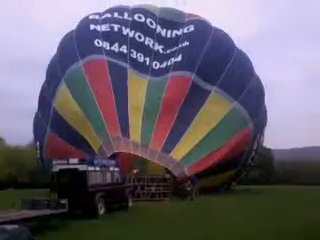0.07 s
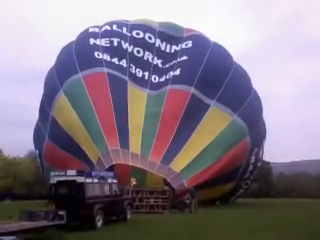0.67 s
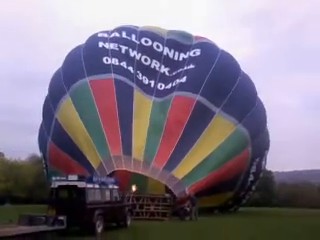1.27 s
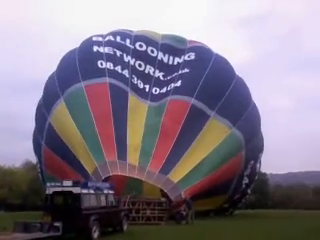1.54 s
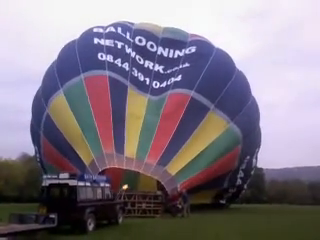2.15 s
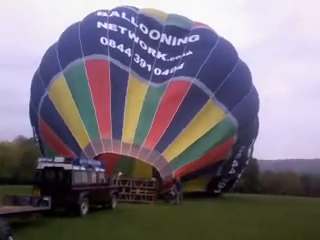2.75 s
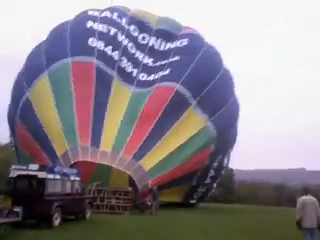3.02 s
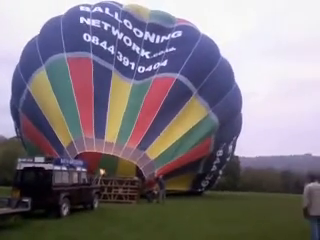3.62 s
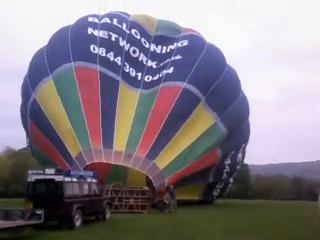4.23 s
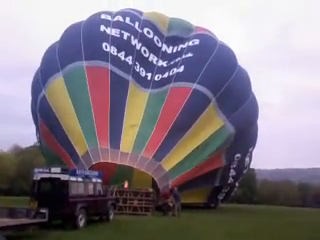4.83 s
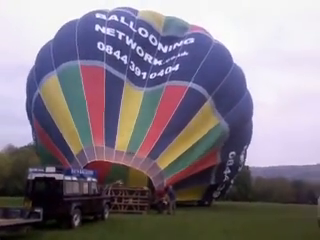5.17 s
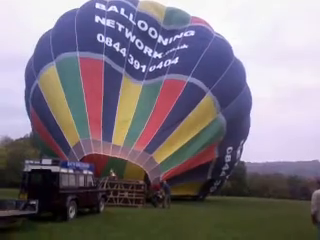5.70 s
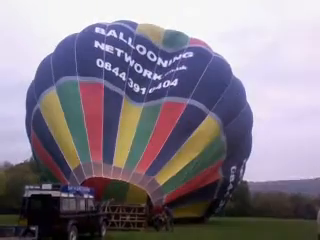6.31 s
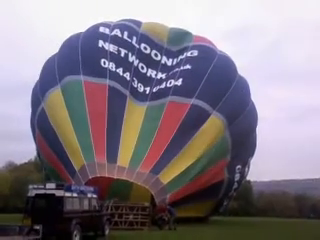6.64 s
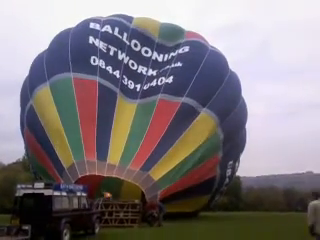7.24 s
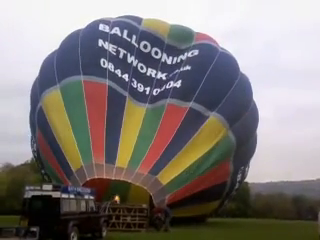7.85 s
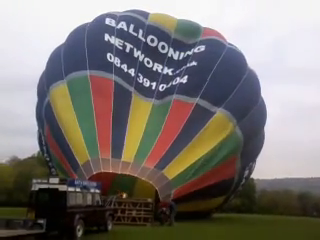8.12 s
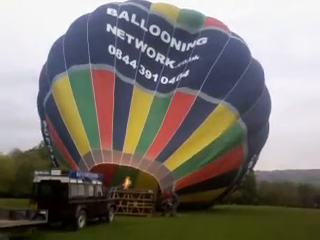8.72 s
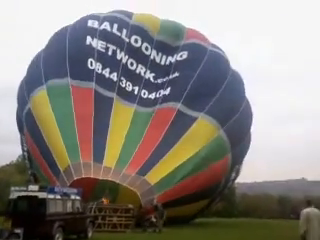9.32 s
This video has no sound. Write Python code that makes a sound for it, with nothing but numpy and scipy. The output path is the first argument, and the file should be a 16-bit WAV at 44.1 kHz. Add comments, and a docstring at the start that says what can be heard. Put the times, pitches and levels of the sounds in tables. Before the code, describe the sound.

A petrol fan filling a hot air balloon starts abruptly as a loud, steady, buzzing drone with rushing, hissing air, and a gas burner roars behind it. After about six seconds the engine is switched off, falling in pitch and puffing ever slower as it spins down. The burner carries on, softer, with a few dull flame flaps. The sound is outdoors, on a small, treble-heavy microphone that the fan overloads.

```python
"""A loud, buzzing drone with rushing air starts abruptly, and a flame roars behind it.
A petrol fan is filling a hot air balloon in an open field: its one-cylinder engine turns a two-blade
propeller. Near the end the engine is switched off and puffs as it spins down; the burner roars on.
The fan overloads the narrow, treble-heavy microphone of a small camera."""
import sys
import numpy as np
from scipy import signal
from scipy.fft import rfft, irfft, next_fast_len
from scipy.io import wavfile

SR = 44100
rng = np.random.default_rng(int(sys.argv[2]) if len(sys.argv) > 2 else 0)


def wav_record(signal):
    """Record a signal, one row per channel, as 16-bit PCM in the file named by sys.argv[1]."""
    frames = np.transpose(np.atleast_2d(signal))
    bounded = np.clip(frames, -1, 1)
    # unit amplitude maps onto the largest positive 16-bit level
    quanta = np.round(bounded * 32767).astype(np.int16)
    wavfile.write(sys.argv[1], SR, quanta)


N = 422037
TIME = np.arange(N) / SR
START_S, IGNITION_OFF_S = 0.9045, 6.79
FULL_SPEED = 59.3  # shaft turns per second

# hiss of the engine and the air stream: f/Hz, relative level/dB
HISS = [(2500, -59), (3400, -18), (4100, -11.5), (4700, -8.5), (5300, -4), (5900, -2.5), (6500, -1.5),
        (7000, -2.5), (7500, -4)]


def from_db(db):
    """Turn decibels into a gain to multiply by."""
    return 10 ** (np.asarray(db) / 20)


def rms_one(x):
    """Scale a sound to an average power of 1."""
    return x / np.sqrt(np.mean(x ** 2) + 1e-20)


def in_time(rows):
    """Turn each column after the time column into a curve, one value per sample."""
    times, *columns = np.transpose(rows)
    return [np.interp(TIME, times, column) for column in columns]


def at_hz(spectrum, hz):
    """Read a spectrum's level between its points, on a log-frequency axis."""
    points_hz, db = np.transpose(spectrum)
    return np.interp(np.log(np.maximum(hz, 1)), np.log(points_hz), db)


def coloured(x, spectrum):
    """Make each frequency of a sound louder or softer, as a spectrum says."""
    size = next_fast_len(N, True)
    gain = from_db(at_hz(spectrum, np.fft.rfftfreq(size, 1 / SR)))
    return irfft(rfft(x, size) * gain, size)[:N]


def noise(spectrum):
    """Noise shaped by a spectrum, with a power of 1."""
    return rms_one(coloured(rng.standard_normal(N), spectrum))


def drift(rate_hz):
    """A smooth random wobble of typical size 1."""
    step = 40  # samples per random value
    pole = np.exp(-2 * np.pi * rate_hz * step / SR)
    slow = signal.lfilter([1], [1, -2 * pole, pole * pole], rng.standard_normal(N // step + 2002))[2000:]
    return np.interp(np.arange(N) / step, np.arange(len(slow)), rms_one(slow))


def swell(start, length, edge_s=0.2):
    """Rise to 1, hold and fall back."""
    inside = np.minimum(TIME - start, start + length - TIME)
    return np.clip(inside / edge_s + 0.5, 0, 1)


def resonances(modes):
    """Swirling air makes something ring: one narrow band of noise for each pitch."""
    out = 0
    for hz, width_hz, db in modes:
        radius = np.exp(-np.pi * width_hz / SR)
        poles = [1, -2 * radius * np.cos(2 * np.pi * hz / SR), radius * radius]
        out += from_db(db) * rms_one(signal.lfilter([1, 0, -1], poles, rng.standard_normal(N)))
    return out


def bursts(events, spectrum, rise_s, gain_db):
    """Bursts of noise that rise and die away."""
    envelope = np.zeros(N)
    for start, db in events:
        age = np.maximum(TIME - start, 0) / rise_s
        envelope += from_db(db + gain_db) * age * np.exp(1 - np.minimum(age, 20))
    return envelope * noise(spectrum)


def firing(fade_s=0.067):
    """1 while the engine burns fuel, falling quickly to 0 once it is switched off."""
    return np.clip((IGNITION_OFF_S - TIME) / fade_s + 1, 0, 1)


def shaft_speed(coast_s=1.23):
    """The engine's governor holds the speed steady; after the switch-off, drag lets it die away."""
    # the shaft under power: t/s, speed/(turns per s)
    running = [(0.9, 59.38), (2.3, 59.51), (3.1, 59.3), (3.5, 59.34), (4.6, 59.1), (5.3, 59.26),
               (5.9, 59.12), (6.79, 59.1)]
    governed, = in_time(running)
    return governed * np.exp(-np.maximum(TIME - IGNITION_OFF_S, 0) / coast_s)


def harmonic(multiple, level_db, angle, slowing, echo, wander_hz=0.96):
    """One blade tone plus its wandering echo; slower blades lose their high tones first."""
    phase = multiple * angle + rng.standard_normal()
    tone = (1 + echo * drift(wander_hz)) * np.sin(phase) + echo * drift(wander_hz) * np.cos(phase)
    tone *= np.sqrt(2 / (1 + 2 * echo ** 2))  # back to a power of about 1
    fade_db = slowing * (46.5 + 20 * max(multiple - 6, 0))
    return from_db(level_db + fade_db + 0.68 * drift(17)) * tone


def blade_tones(turns, slowing):
    """Each passing blade sends out a push of air: a drone, and a buzz whose tones swell and fade."""
    # the drone's two loud tones: t/s, relative level/dB at 3 times and at 5 times the blade rate
    drone = [(1.0, -26, -22.5), (1.59, -24.5, -22.5), (2.54, -25.5, -24.5), (2.9, -30, -24.5),
             (3.89, -29, -23), (4.19, -31, -23.5), (5.03, -26.5, -24.5), (6.0, -30.5, -27.5),
             (6.16, -26, -31.5), (6.7, -29.5, -26)]
    # the weaker tones of the buzz: multiple of the blade rate, relative level/dB
    buzz = [(2, -15), (4, -14), (6, -16), (7, -11), (8, -15), (9, -14), (10, -12.5), (11, -11), (12, -7.5),
            (13, -12.5), (14, -10), (15, -11.5), (16, -15.5), (17, -17), (18, -21), (19, -14.5), (20, -15)]
    # one of them stands out for a while: start t/s, length/s, multiple, lift/dB
    swells = [(0.8, 2.9, 10, 6.5), (1.4, 2.3, 2, 5.5), (1.6, 3.78, 9, 5), (1.95, 0.77, 6, 6),
              (3.7, 0.53, 9, 4), (3.7, 0.79, 13, 8), (3.75, .45, 4, 7), (4.25, 1.85, 2, 7),
              (4.453, 2.7, 6, 9), (4.946, 0.4, 10, 10.5), (5.685, 0.33, 7, 7), (5.953, 1.01, 4, 10)]
    angle = 2 * np.pi * 2 * turns + 0.022 * drift(12.4)  # two blades a turn, with a slight flutter
    out = 0
    for multiple, db in zip((3, 5), in_time(drone)):
        out += harmonic(multiple, db + 2, angle, slowing, echo=0)
    for multiple, db in buzz:
        lift_db = sum(lift * swell(start, length) for start, length, k, lift in swells if k == multiple)
        echo = from_db(-20.5) * np.sqrt(multiple)  # shorter waves feel the changing echo path more
        out += harmonic(multiple, db - 20.5 + lift_db, angle, slowing, echo)
    out *= from_db(firing() - 1)  # 1 dB softer with the engine off
    # a small propeller gives off little bass
    return signal.sosfilt(signal.butter(8, 221, "high", fs=SR, output="sos"), out)


def air_stream(turns, slowing):
    """Air swirls off the blades with a rush; the hiss surges each time the exhaust valve opens."""
    # air moved by the fan: t/s, relative rush level/dB, relative hiss level/dB
    air = [(0.95, -16, -9), (1.32, -15.5, -11), (2.5, -17.5, -11.5), (2.68, -17, -9.5), (4.04, -15.5, -9),
           (4.73, -17.5, -10), (5.2, -15, -11), (6.6, -20, -10), (6.75, -17, -9.5)]
    # swirling air off the blades: f/Hz, relative level/dB
    rush_spectrum = [(40, -17), (110, -11.5), (180, -9.5), (290, -19), (380, -12), (500, -9.5), (740, -8),
                     (900, -11.5), (1350, 3), (1850, 3.5), (2150, 0.5), (3150, -2), (4200, -1), (7000, -22)]
    rush_db, hiss_db = in_time(air)
    rush = from_db(rush_db - 2.5 + 63 * slowing) * noise(rush_spectrum)
    valve_open = np.exp(2.5 * (np.cos(np.pi * turns) - 1))  # peaks every second turn
    depth_db = 1.3 + 2.7 * firing()
    surge = rms_one(from_db(depth_db * (valve_open + 0.06)))
    hiss = from_db(hiss_db + 8.5 + 0.43 * drift(12) + 88 * slowing) * noise(HISS)
    return rush + hiss * surge


def frame():
    """The fan's frame and guard shake and ring at a few pitches."""
    # their resonances: f/Hz, width/Hz, level/dB
    modes = [(1425, 115, -31.5), (1740, 220, -32), (2380, 70, -30.5), (2850, 84, -31.5), (3598, 100, -29.5)]
    return resonances(modes) * from_db(drift(0.79))


def exhaust(turns, gain_db, uneven_db, size=4096):
    """One bang every second turn, smeared out by the silencer; no two are equally strong."""
    # the exhaust note: f/Hz, relative level/dB of a tone there
    spectrum = [(30, -54), (59, -46), (90, -50), (119, -46.5), (170, -55.5), (210, -45), (270, -54),
                (360, -58), (450, -34.5), (640, -38.5), (850, -55), (1230, -36), (1480, -46), (2100, -46),
                (3500, -47)]
    multiples = np.arange(1, 120)  # of the bang rate
    tones = from_db(at_hz(spectrum, multiples * FULL_SPEED / 2))
    tones = tones * np.exp(2j * np.pi * rng.random(len(multiples)))  # random phases smear the bang
    # every fourth tone lands on a multiple of the blade rate; of those, keep only the lowest
    tones *= (multiples % 4 > 0) | (multiples == 4)
    cycle = irfft(np.r_[0, tones], size) * size / np.sqrt(2)
    bangs = np.interp(turns / 2 % 1 * size, np.arange(size), cycle)
    return bangs * firing() * from_db(gain_db + uneven_db * drift(7.7))


def burner(gain_db, flicker_db):
    """The gas jet hisses and the flame rumbles, flickering all the time."""
    # the burner's roar: f/Hz, relative level/dB
    spectrum = [(112, -44), (170, -23.5), (270, -4), (400, -12.5), (520, -7), (900, -7.5), (1400, -11.5),
                (2000, -17), (4000, -17), (5700, -8.5), (6900, -5.5)]
    # its strength: t/s, relative level/dB
    strength = [(7.0, -17.5), (7.9, -24.5), (8.5, -24), (9.0, -24.5), (9.5, -25)]
    # hollow resonances of the burner and its flame: f/Hz, width/Hz, level/dB
    modes = [(266.7, 28, -37.5), (737, 60, -39), (2380, 90, -49)]
    db, = in_time(strength)
    jet = from_db(db + gain_db + flicker_db * drift(30)) * noise(spectrum)
    return jet + resonances(modes) * from_db(1.3 * drift(8.4))


def open_air(level_db):
    """The open air rumbles, low and steady."""
    # the rumble: f/Hz, relative level/dB
    spectrum = [(20, -0.5), (50, 1), (75, -6), (105, -32), (300, -77)]
    return from_db(level_db) * noise(spectrum)


def guard(width_hz):
    """Now and then the fan's wire guard sings out at one pitch."""
    # spells of singing: start t/s, length/s, f/Hz, level/dB
    spells = [(1.07, 0.48, 2357, -22.5), (1.72, .35, 2400, -26), (2.2, 0.7, 2393, -28.5),
              (4.413, 1.1, 2390, -28), (6.55, .6, 2398, -29)]
    return sum(swell(start, length) * resonances([(hz, width_hz, db)]) for start, length, hz, db in spells)


def ringing(level_db, width_hz, start_s=1.1, length_s=1.15, start_hz=2893, sink_hz_per_s=380):
    """A thin ringing: a narrow band of noise swells and fades once while its pitch sinks."""
    age = np.clip(TIME - start_s, 0, length_s)
    angle = 2 * np.pi * np.cumsum(start_hz - sink_hz_per_s * age) / SR
    envelope = from_db(level_db) * np.sin(np.pi * age / length_s)
    return envelope * (drift(width_hz) * np.cos(angle) + drift(width_hz) * np.sin(angle))


def puffs(speed, valve_phase, fade_db_per_s):
    """The coasting cylinder lets out a puff of air every second turn, ever slower and weaker."""
    cycles = np.cumsum(speed * (TIME > IGNITION_OFF_S)) / SR / 2
    valve_opens = np.diff(np.floor(cycles - valve_phase), prepend=0) > 0
    times = TIME[valve_opens & (speed < 38.5)]  # slow enough to hear the puffs one by one
    levels_db = -fade_db_per_s * (times - times[0])
    return bursts(zip(times, levels_db), HISS, rise_s=0.008, gain_db=-11.5)


def flame_flaps():
    """The flame flaps a few times, soft and low."""
    # the flaps: t/s, relative peak level/dB
    flaps = [(7.813, -16), (7.859, -21), (8.029, -23), (8.504, -20), (9.289, -23)]
    # the dull sound of one flap: f/Hz, relative level/dB
    spectrum = [(90, -18), (180, -10), (280, 3), (450, -4), (750, -16), (1500, -29), (4000, -45)]
    return bursts(flaps, spectrum, rise_s=0.0099, gain_db=-9.5)


def scene():
    """Fan and burner in the open air; the fan's sounds sink as its shaft slows."""
    speed = shaft_speed()
    slowing = np.log10(speed / FULL_SPEED)  # 0 at full speed, -1 at a tenth of it
    turns = np.cumsum(speed) / SR
    # the coasting shaft lurches each time the piston squeezes the air, which blurs the tones
    turns += slowing * (0.053 * np.sin(np.pi * turns) + 0.065 * drift(8.9))
    fan = blade_tones(turns, slowing) + air_stream(turns, slowing)
    fan += (frame() + guard(width_hz=36)) * from_db(54 * slowing)
    fan += exhaust(turns, gain_db=-2, uneven_db=2.5)
    fan += ringing(level_db=-20.5, width_hz=200)
    fan += puffs(speed, valve_phase=0.23, fade_db_per_s=18)
    flame = burner(gain_db=6, flicker_db=1) + flame_flaps()
    return (fan + flame + open_air(level_db=-44))[None]


def record(dry):
    """The microphone loses the highest treble; loud peaks are then cut flat, adding a faint fizz."""
    # top edge of the microphone's range: f/Hz, level/dB
    mic_edge = [(7050, 0), (7400, -13), (7700, -29), (8020, -55), (8300, -42), (8750, -37), (9200, -46),
                (9600, -95)]
    clipped = np.clip(coloured(dry[0], mic_edge), -0.75, 0.75)
    clipped *= TIME >= START_S  # silence until the camera starts
    softened = signal.sosfilt(signal.butter(1, 12400, fs=SR, output="sos"), clipped)
    return coloured(softened, [(15850, 0), (16050, -90)])[None]  # the fizz ends steeply here


dry = scene()
out = record(dry)
wav_record(out)
```